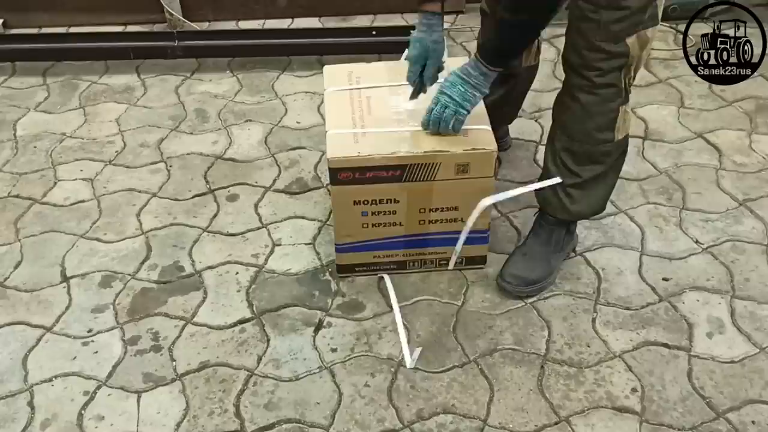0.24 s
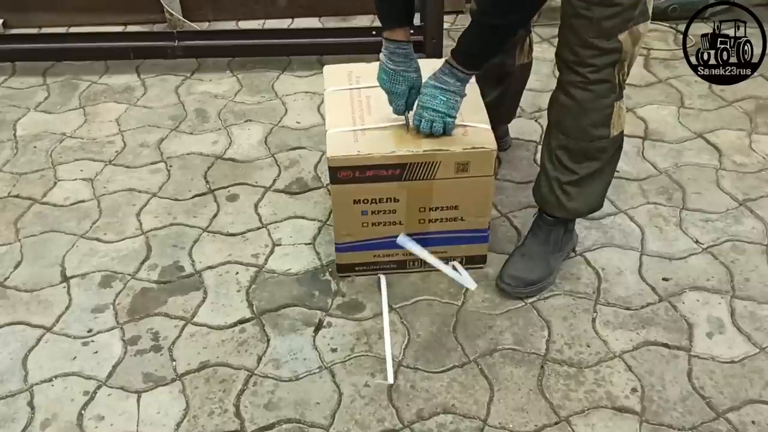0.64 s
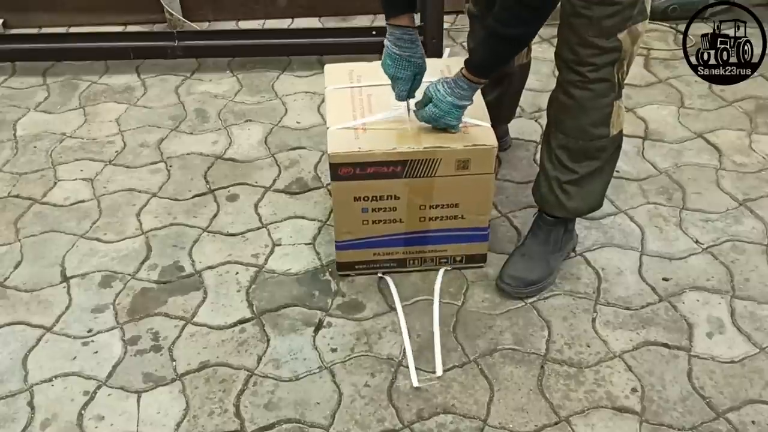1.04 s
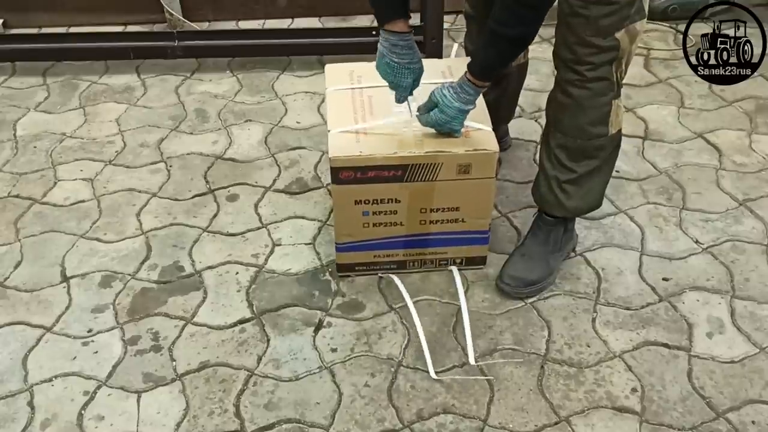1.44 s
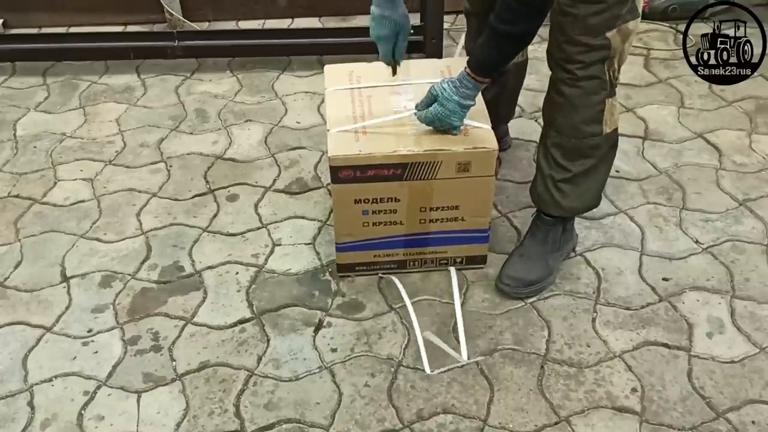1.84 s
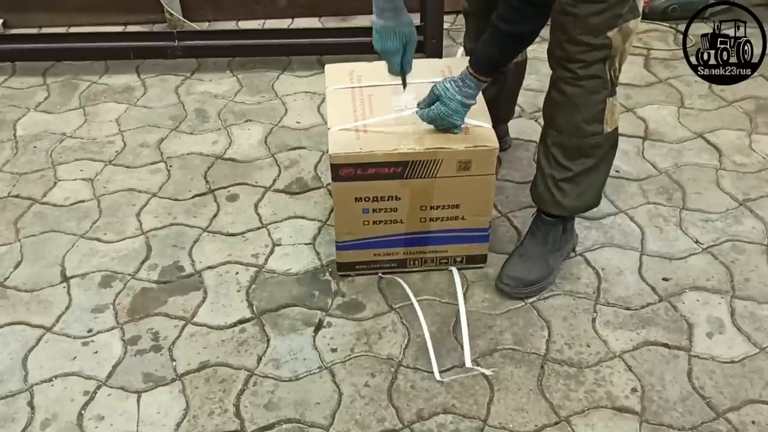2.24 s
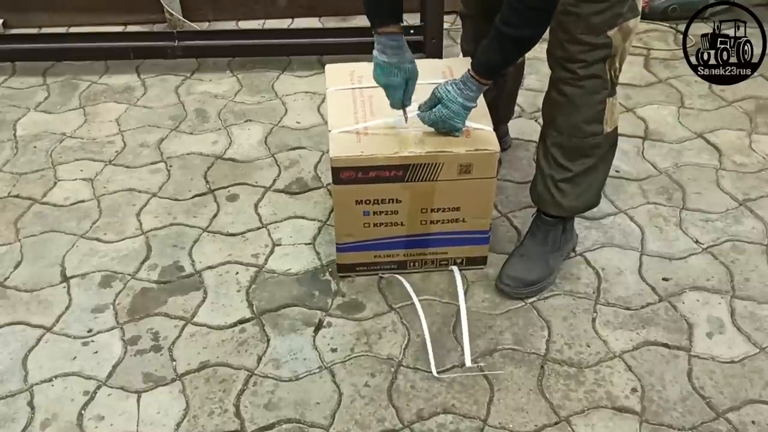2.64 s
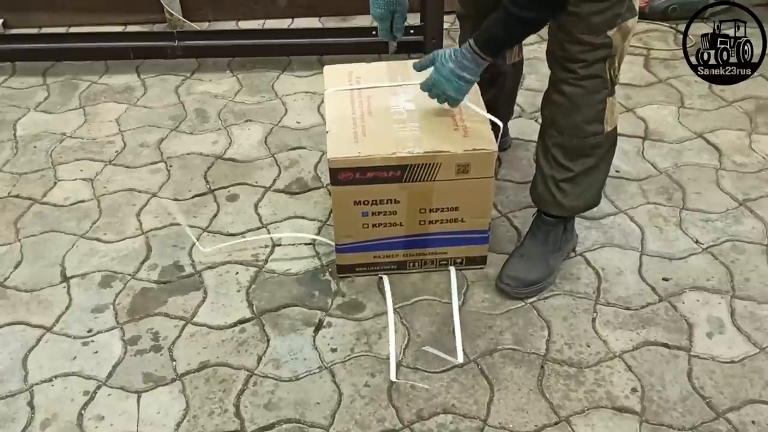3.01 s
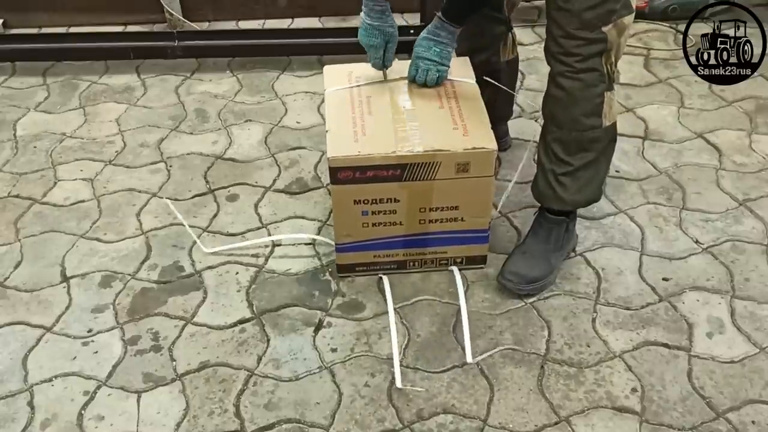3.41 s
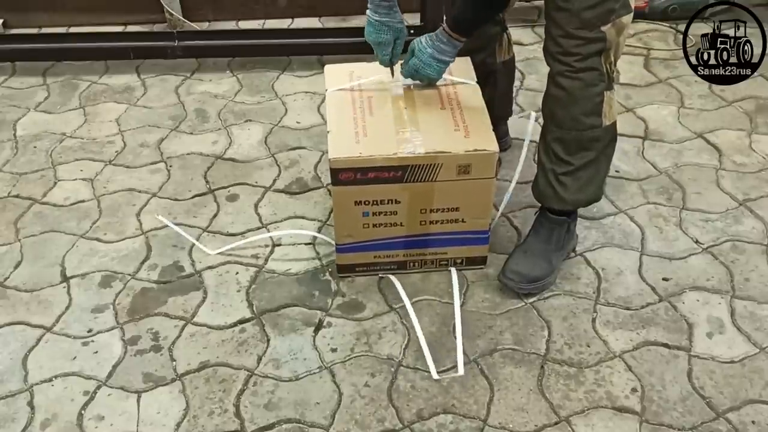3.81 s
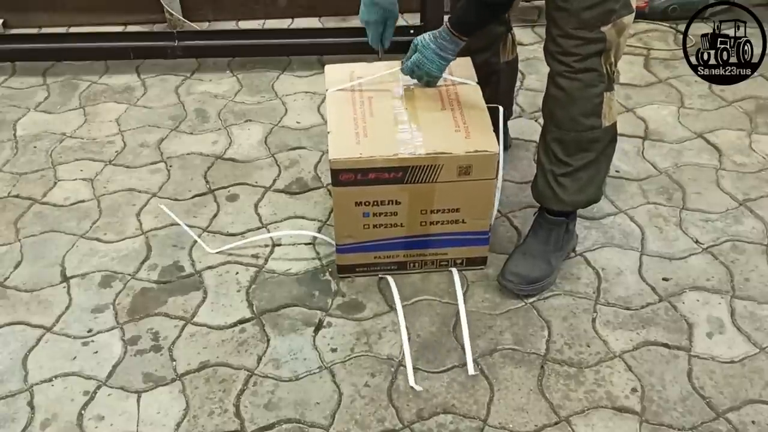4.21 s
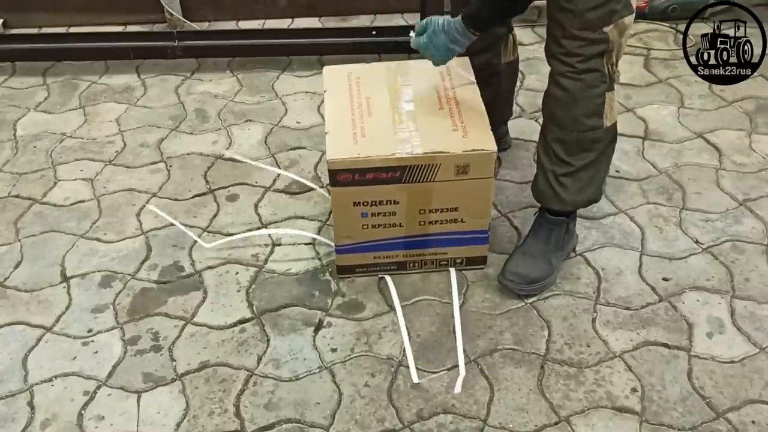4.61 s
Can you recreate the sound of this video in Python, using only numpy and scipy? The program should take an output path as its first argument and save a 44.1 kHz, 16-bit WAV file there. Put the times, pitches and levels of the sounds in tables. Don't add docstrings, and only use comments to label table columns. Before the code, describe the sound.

Gloved hands cut plastic packing straps from a cardboard box outdoors. Light bumps, dry rustles and ticks lead to a cluster of snaps, a short crack, and a hard bang with a boxy boom. After a quieter stretch of faint rubbing, two more violent whip-like snaps follow, then a small crack and a bump. Late, swelling echoes follow the blows; the small microphone clips and ducks briefly.

```python
import sys
import numpy as np
from scipy import signal
from scipy.io import wavfile
from scipy.ndimage import uniform_filter1d

SR = 44100
rng = np.random.default_rng(int(sys.argv[2]) if len(sys.argv) > 2 else 0)


def generate_wav(sig):
    pcm = np.round(np.clip(np.atleast_2d(sig).T, -1, 1) * 32767).astype(np.int16)
    wavfile.write(sys.argv[1], SR, pcm)


def volts_from_decibels(level):
    exponent = np.asarray(level, float) / 20
    return 10 ** exponent


N = 209651
LEAD = 2205
EARLY_S = -0.016

# frequency in Hz, level in dB.
HUM_SPECTRUM = [(25, -37), (45, -1), (90, -4.5), (380, -8), (700, -13), (1300, -22), (4400, -27),
                (7800, -31.5), (8900, -17), (11500, -15.5), (11700, -22.5), (16000, -14.5)]
# frequency in Hz, 60 dB decay in seconds.
YARD_DECAY = [(60, 0.41), (250, 0.66), (700, 0.84), (2000, 0.84), (5000, 0.68), (9000, 0.53), (16000, 0.4)]
# delay in seconds, level in dB.
ECHO_SWELL = [(0, -27), (.006, -1), (.02, 1), (.05, 1), (.1, 0.5), (.2, -0.5), (.3, -2.5), (.5, -3)]
# frequency in Hz, level in dB.
ECHO_TONE = [(60, 0), (150, -3.5), (250, 0.5), (8300, -0.5), (8800, -8), (11400, -13), (11900, -7.5),
             (16000, -10)]
# frequency in Hz, level in dB.
CRACK_ECHO_COLOUR = [(200, 3.5), (700, -7.5), (1500, -0.5), (3500, -0.5), (7000, -9), (8400, -8.5),
                     (9000, -2), (11300, 0.5), (12000, -3.5), (16000, -5)]
# frequency in Hz, level in dB.
SLAP_ECHO_COLOUR = [(50, 1.5), (130, -6), (220, 6), (310, -4.5), (400, 5), (500, -1), (950, -5.5),
                    (1600, -13), (4000, -32), (16000, -23.5)]
# frequency in Hz, level in dB.
OVERALL_TONE = [(30, -31), (80, -0.5), (4750, -1), (5050, -8.5), (5900, -9.5), (6150, -2.5), (7620, -7),
                (7760, -12.5), (8400, -15.5), (8800, -28.5), (11540, -29.5), (11640, -15.5), (15720, -23.5),
                (15880, -59)]

# frequency in Hz, 60 dB decay in seconds, level in dB.
BOX_MODES = [(169, 0.012, 12), (205, 0.036, -3), (319.7, 0.032, 5.5), (400, 0.084, -7.5), (522, 0.035, -2),
             (775, 0.029, 1.5), (974, 0.029, -2), (1297, 0.015, 0.5), (2130, 0.0069, 1.5)]
# frequency in Hz, level in dB.
STRAP_SPECTRUM = [(300, -43.5), (900, -7.5), (1500, 8), (2600, 3), (3600, 7), (4500, 1), (6300, 0),
                  (9000, -7), (16000, -2)]
# frequency in Hz, level in dB.
SCRAPE_SPECTRUM = [(300, -34), (1000, -3.5), (2500, -2), (4000, 2.5), (8000, -12.5), (16000, -0.5)]

# peak time in seconds, peak level in dB,
# rise in seconds, fall in seconds (both over 20 dB).
STRAP_SCRAPES = [(.485, -46, 0.12, 0.027), (.558, -47.5, 0.11, 0.054), (.637, -45, 0.008, 0.03),
                 (.675, -40, .02, 0.024), (.72, -70, .03, 0.34), (.812, -51.5, .045, 0.017),
                 (.838, -52, 0.0056, 0.024), (.86, -52.5, 0.025, .3), (.935, -46, 0.19, 0.013),
                 (1.17, -53, 0.12, 0.033), (1.405, -49, .011, 0.07), (1.522, -42, 0.026, 0.0057),
                 (1.99, -55, 0.056, 0.17), (2.1, -50, 0.19, 0.025), (2.126, -41, 0.0057, 0.0087),
                 (2.16, -44, 0.023, .006), (2.36, -53, 0.0094, .05), (2.414, -54, 0.006, .11),
                 (2.468, -32, 0.0039, 0.011), (2.503, -46, .018, .011), (2.808, -30.5, 0.01, 0.011),
                 (2.84, -47, .07, .011), (3.358, -48, .08, 0.12), (3.48, -52.5, .14, 0.15),
                 (3.658, -53.5, 0.11, 0.1), (3.706, -44, 0.041, 0.19), (4.016, -35.5, .006, 0.043),
                 (4.345, -57.5, .021, 0.24), (4.463, -32, 0.0082, 0.021), (4.71, -48, .011, .08)]
# peak time in seconds, peak level in dB,
# rise in seconds, fall in seconds (both over 20 dB).
GLOVE_SHOVES = [(.392, -52, 0.057, .04), (.485, -37, 0.048, 0.035), (.54, -47.5, 0.12, 0.41),
                (.636, -32.5, 0.005, 0.017), (.68, -35, 0.058, 0.015), (.74, -50, .11, 0.28),
                (.84, -46, 0.015, 0.066), (.936, -48, 0.035, 0.018), (1.11, -47.5, .015, 0.19),
                (1.405, -49, 0.0085, 0.1), (1.52, -40, 0.016, 0.0043), (1.865, -65, 0.012, 0.033),
                (1.95, -52, 0.032, 0.059), (2.11, -44.5, 0.4, 0.052), (2.158, -37, 0.021, 0.011),
                (2.47, -38.5, 0.012, 0.11), (2.51, -44, 0.044, 0.0045), (2.605, -39.5, 0.014, 0.088),
                (2.756, -41, 0.023, .024), (2.81, -34, 0.014, 0.12), (3.225, -46, .011, 0.061),
                (3.335, -48.5, .021, .16), (3.52, -49.5, 0.089, 0.16), (3.658, -41, 0.015, .021),
                (3.706, -48, 0.047, 0.27), (4.036, -36, 0.051, 0.014), (4.404, -47, 0.037, .21),
                (4.465, -35, 0.0082, 0.1), (4.705, -44, 0.0091, 0.011), (4.752, -35, 0.032, .021)]

# start in seconds, peak level in dB, # ring in Hz, 60
# dB decay in seconds, brightness in dB per octave.
FIBRE_BREAKS = [(.094, -23, 6500, .01, 14), (.668, -35, 2200, .03, -3), (1.3, -34, 6310, .01, 11),
                (1.5075, -34, 1600, .015, 7), (1.5215, -24, 6300, .03, 9), (2.801, -28, 4500, 0.034, 6),
                (2.8245, -28, 6300, .025, 8), (2.843, -15, 6300, .014, 8), (2.8564, -16, 3200, 0.014, 4),
                (2.697, -36.5, 4400, .015, 5), (4.054, -21, 7000, .03, 6), (4.4562, -28, 5600, .02, 6),
                (4.6786, -8, 3500, 0.0063, -2), (4.499, -6.5, 6500, 0.0052, 5), (1.5278, -4, 4220, 0.01, 7),
                (.483, -25.5, 2200, 0.0089, -1), (2.557, -28.5, 4000, .02, 1), (4.679, -9, 2340, 0.015, -2),
                (2.858, -4.5, 3450, .008, 4.5), (2.1685, -8.5, 2000, 0.011, 1.5), (2.9, -37, 6200, .01, 8),
                (.936, -41, 3000, .015, 3)]
# start in seconds, # length
# in seconds, start pitch in Hz, end pitch in Hz, level in dB.
MORE_DRONES = [
    (2.905, 0.059, 400, 425, -20.5),
    (4.55, 0.055, 400, 394, -17),
    (.805, .02, 205, 200, -42),
    (.925, 0.0255, 150, 150, -42),
    (2.97, .065, 390, 370, -29),
    (3.05, .08, 370, 400, -33),
    (3.14, .1, 380, 370, -40),
    (2.124, .04, 400, 400, -40),
    (4.6, .06, 410, 400, -25),
]
# start in seconds, peak level in dB,
# pitch in Hz, 60 dB decay in seconds.
STRAP_PINGS = [(1.528, -11, 3450, .012), (1.5285, -12, 4200, .01), (1.5285, -12, 6300, .012),
               (1.5285, -12, 7500, .01), (1.608, -14, 6800, .015), (4.0575, -8, 3500, .008),
               (4.679, -14, 2300, .012), (4.6795, -15, 3100, .012), (2.169, -13, 3200, .012),
               (2.169, -13, 1900, .012), (.483, -31, 1750, .012), (.634, -36, 850, .02),
               (3.199, -36, 2200, .02), (1.555, -22, 1000, .015)]
# start in seconds, length in seconds,
# start pitch in Hz, end pitch in Hz, level in dB.
STRAP_TWANGS = [(1.326, 0.023, 1660, 1640, -34), (1.35, 0.057, 558, 585, -42.5),
                (2.463, 0.052, 1350, 1395, -42), (2.565, 0.04, 1388, 1380, -39),
                (2.655, 0.04, 1380, 1395, -49), (3.201, 0.014, 2170, 2100, -40),
                (3.204, 0.14, 2150, 2100, -53), (3.81, 0.2, 1673, 1725, -64),
                (1.633, 0.013, 1480, 1490, -20.5), (2.858, 0.12, 400, 400, -23.5),
                (4.516, 0.18, 400, 400, -20.5), (4.057, 0.04, 725, 745, -21.5)]

# start in seconds, peak level in dB, ring in Hz,
# brightness in dB per octave.
LOOSE_TICKS = [(0.1943, -29, 1670, -2), (0.6747, -33, 2120, -10), (0.836, -48, 3320, 10),
               (0.9353, -46, 3160, -3), (1.174, -37, 1630, 7), (2.6976, -44, 2100, -3.5),
               (3.249, -40.5, 2160, -13), (3.3572, -32.5, 1820, 8), (3.466, -51, 3810, 2),
               (3.509, -39, 1560, 8), (3.6308, -38, 4540, 7), (3.754, -38, 1720, 3),
               (3.964, -41.5, 1670, -6)]
# start in seconds, peak level in dB, ring in Hz,
# brightness in dB per octave, share thrown to the walls in dB.
FRAYING_TEARS = [(0.6344, -34.5, 1800, 11, -7), (0.812, -35, 4350, 4, -14.5), (1.333, -19, 4330, 8, -21),
                 (1.347, -19, 1640, 3.5, -21), (1.6068, -9, 2300, 4.5, -16.5),
                 (2.1231, -29.5, 2150, 2, -10.5), (2.169, -9, 3360, -5, -14),
                 (2.4652, -25, 2540, 2.5, -13.5), (2.5171, -11.5, 1600, -7.5, -20.5),
                 (2.5574, -21.5, 2300, -7, -20), (2.806, -19, 1484, 3.5, -32),
                 (4.0095, -25.5, 1590, 3, -12), (4.0575, -12, 3530, 3, -44), (4.459, -22.5, 2280, 1.5, -35),
                 (4.679, -9.5, 1660, -1.5, -40)]
# start in seconds, peak level in dB, ring in Hz,
# brightness in dB per octave, share thrown to the walls in dB.
DRY_SNAPS = [(0.4817, -28.5, 1820, -2.5, -23), (1.087, -17.5, 3180, 7, -29.5), (1.0975, -29, 1740, 1, -31),
             (1.3228, -26, 4300, 10, -6.5), (1.327, -14.5, 1630, 9, -27), (1.481, -31, 1540, 11, -16),
             (1.5279, -11, 2500, 2, -10.5), (1.555, -12.5, 1520, 3, -14.5), (1.6334, -9, 1500, -5.5, -16),
             (2.4166, -27, 1600, 14.5, -30), (2.827, -23.5, 2470, 0.5, -13),
             (2.8438, -15.5, 2130, -1, -8.5), (2.858, 2.5, 1590, -5, -24.5), (3.199, -30.5, 2290, -5, -16),
             (3.7142, -31, 2540, 3, -22), (4.0409, 4.5, 3596, -1.2, -24), (4.475, -23, 3140, 8, -17),
             (4.4977, -6.5, 3150, 4, -13), (4.5031, 1.5, 2160, 1, -22.5)]
# peak level in dB, ring in Hz, brightness in dB per octave,
# share thrown to the walls in dB.
EARLIER_CRACK = (-11.5, 3300, 0.1, -10)

# start in seconds, peak level in dB, panel in Hz,
# share thrown to the walls in dB, 60 dB decay in seconds.
BOX_BUMPS = [(0.482, -29, 314, -25, 0.076), (0.5445, -28, 150, -17.5, 0.064), (0.633, -32, 300, -18, .05),
             (0.646, -26.5, 170, -16, 0.07), (0.6752, -24, 281, -29, 0.071), (0.834, -35, 127, -40, 0.12),
             (1.323, -41.5, 260, -4.5, .1), (2.122, -30.5, 361, -12, 0.14),
             (2.517, -21.5, 382, -12.5, 0.087), (2.847, -23, 267, -29, .07), (3.506, -33, 237, -27, 0.082),
             (4.459, -33.5, 320, -23, .1), (4.479, -36, 205, -11, .07), (4.68, -25.5, 214, -15, .1),
             (4.74, -18, 310, -20, .1)]
# start in seconds, peak level in dB,
# patch in Hz, 60 dB decay in seconds.
EDGE_KNOCKS = [
    (1.607, -13, 1377, 0.042),
    (2.169, -9, 790, 0.015),
    (2.52, -17, 1390, 0.026),
    (2.858, 3.5, 888, 0.024),
    (4.041, -3.5, 933, 0.024),
    (4.059, -4, 786, 0.0097),
    (4.503, 5, 785, 0.0095),
]
# start in seconds,
# peak level in dB, panel in Hz, share thrown to the walls in dB.
STRAP_WHIPS = [(1.085, -29.5, 358, -12.5), (1.553, -19.5, 382, -16), (1.606, -11, 205, -14.5),
               (1.633, -12.5, 205, -18.5), (2.167, -8.5, 358, -17), (2.554, -28.5, 243, -27),
               (2.699, -36, 263, -26), (2.857, 5.5, 357.6, -17), (3.345, -40, 149.5, -5.5),
               (3.451, -41.5, 154, -5), (3.702, -29.5, 241, -17), (3.749, -33.5, 198, -13),
               (4.039, -4, 214, -20.5), (4.051, -1, 487, -20.5), (4.057, 5.5, 758, -26),
               (4.07, -9.5, 300, -26), (4.497, -13, 308, -9.5), (4.503, 5, 622, -16.5),
               (4.506, -0.5, 320, -13)]
# peak level in dB, panel in Hz, share thrown to the walls in dB.
EARLIER_SLAP = (-1.5, 288, -15)


def evened(x):
    return x / np.sqrt(np.mean(x ** 2) + 1e-20)


def read(points, hz):
    f, value = np.transpose(points)
    return np.interp(np.log(hz + 1), np.log(f + 1), value)


def add(mix, s, sound):
    part = mix[round(s * SR) + LEAD:][:len(sound)]
    part += sound[:len(part)]


def colour(x, points, size=4096):
    log_gain = np.log(volts_from_decibels(read(points, abs(np.fft.fftfreq(size, 1 / SR)))))
    taps = np.fft.ifft(np.exp(np.conj(signal.hilbert(log_gain)))).real[:size // 2]
    return signal.oaconvolve(x, taps)[:len(x)]


def ring(hz, t60, size=3000):
    t = np.arange(size) / SR
    return volts_from_decibels(-60 * t / t60) * np.sin(2 * np.pi * hz * t)


def air():
    hz = np.fft.rfftfreq(1024, 1 / SR)
    real, imag, patches = rng.standard_normal(((N + LEAD) // 256 + 5, 513, 3)).T
    patches = evened(uniform_filter1d(uniform_filter1d(patches, 10, 0), 12, 1))
    depth_db = np.interp(hz, [5000, 9000], [2.3, 0.8])[:, None]
    z = (real + 1j * imag) * volts_from_decibels(read(HUM_SPECTRUM, hz)[:, None] + depth_db * patches)
    hum = signal.istft(z, nperseg=1024, noverlap=768)[1][:N + LEAD]
    return volts_from_decibels(-47) * evened(hum)


def yard(feeds):
    taps = np.zeros((len(feeds), SR))
    at = np.arange(40, SR - 12, 12)
    at = at + rng.integers(0, 12, (len(feeds), len(at)))
    np.put_along_axis(taps, at, rng.choice([-1., 1.], at.shape), 1)
    swell = volts_from_decibels(np.interp(np.arange(SR) / SR, *np.transpose(ECHO_SWELL)))
    hz, t, z = signal.stft(taps * swell, SR, nperseg=256)
    chance = rng.standard_normal(z.shape)
    lumps = evened(uniform_filter1d(uniform_filter1d(chance, 4, 1), 5, 2))
    glints = evened(uniform_filter1d(chance, size=60, axis=1))
    decay_db = -60 * t / read(YARD_DECAY, hz)[:, None]
    tails = signal.istft(z * volts_from_decibels(1.97 * lumps + 0.61 * glints + decay_db), SR, nperseg=256)[1]
    tails = tails / np.linalg.norm(tails, axis=1, keepdims=True)
    echo = signal.fftconvolve(feeds, tails, axes=1)[:, :N + LEAD].sum(0)
    return colour(echo, ECHO_TONE)


def strokes(rows, t):
    return sum(volts_from_decibels(db - 20 * np.maximum((s - t) / rise, (t - s) / fall)) for s, db, rise, fall in rows)


def drags():
    t = (np.arange(N + LEAD) - LEAD) / SR
    slips = volts_from_decibels(3.6 * evened(uniform_filter1d(rng.standard_normal(len(t)), 300)))
    noise = rng.standard_normal((2, len(t)))
    grains_db = 2.0 * np.minimum(rng.exponential(1, (2, len(t))), 5)
    grit = noise * volts_from_decibels(grains_db) * slips
    bright = evened(colour(grit[0], SCRAPE_SPECTRUM))
    box = sum(volts_from_decibels(d) * ring(f, t60) for f, t60, d in BOX_MODES)
    dull = evened(signal.oaconvolve(grit[1], box)[:len(t)])
    return strokes(STRAP_SCRAPES, t) * bright + strokes(GLOVE_SHOVES, t) * dull


def twang(length, start_hz, end_hz, db, noise):
    u = np.linspace(0, 1, round(length * SR))
    flutter, wander = (evened(uniform_filter1d(z, 450))[:len(u)] for z in noise)
    glide_hz = start_hz + (end_hz - start_hz) * u
    tone = np.sin(2 * np.pi * np.cumsum(glide_hz) / SR + 0.65 * wander)
    return volts_from_decibels(db - 4.0 * u) * tone * (1 + 0.5 * flutter) * signal.windows.tukey(len(u), 0.4)


def crack(db, hz, t60, tilt_db, noise):
    t = np.arange(len(noise)) / SR
    splutter = noise * volts_from_decibels(-60 * t / t60) * (1 - np.exp(-t / 0.00036)) ** 2
    tilted = [(f, d + tilt_db * np.log2(np.clip(f, 700, 8000) / 2500)) for f, d in STRAP_SPECTRUM]
    burst = colour(splutter, tilted)
    loose_end = np.convolve(splutter, ring(hz, 0.0048, size=400))[:len(t)]
    sound = evened(burst) + 1.15 * volts_from_decibels(-abs(tilt_db)) * evened(loose_end)
    return volts_from_decibels(db) * sound / abs(sound).max()


def slap(db, hz, t60, touch_ms, weights):
    panels = sum(w * volts_from_decibels(d) * ring(f, t) for w, (f, t, d) in zip(weights, BOX_MODES))
    push = np.exp(-(np.arange(-200, 200) / (SR * touch_ms / 4000 + 1)) ** 2)
    sound = np.convolve(ring(hz, t60) + 0.33 * panels, push)[160:]
    sound = signal.lfilter(*signal.butter(2, 105, "high", fs=SR), sound)
    return volts_from_decibels(db) * sound / abs(sound).max()


def fibres():
    out = np.zeros(N + LEAD)
    for (s, *tick), z in zip(FIBRE_BREAKS, rng.standard_normal((len(FIBRE_BREAKS), 2000))):
        add(out, s, crack(*tick, z))
    for (s, *tone), z in zip(MORE_DRONES, rng.standard_normal((len(MORE_DRONES), 2, 12000))):
        add(out, s, twang(*tone, z))
    onset = np.minimum(np.arange(3000) / 20, 1)
    for s, db, hz, t60 in STRAP_PINGS:
        add(out, s, volts_from_decibels(db) * ring(hz, t60) * onset)
    return out


def all_cracks():
    snaps = [(*r, 0.015) for r in [(EARLY_S, *EARLIER_CRACK), *DRY_SNAPS]]
    tears = [(*r, 0.028) for r in FRAYING_TEARS]
    ticks = [(*r, -16.5, 0.013) for r in LOOSE_TICKS]
    return sorted(snaps + tears + ticks)


def all_slaps():
    whips = [(*r, 0.031, np.interp(r[1], [-24, 0], [0.52, 0.22]))
             for r in [(EARLY_S, *EARLIER_SLAP), *STRAP_WHIPS]]
    bumps = [(*r, 1.5) for r in BOX_BUMPS]
    knocks = [(s, db, hz, -48, t60, 0.19) for s, db, hz, t60 in EDGE_KNOCKS]
    return sorted(whips + bumps) + knocks


def hits():
    dry, blows = np.zeros(N + LEAD), np.zeros((2, 3, N + LEAD))
    cracks, slaps = all_cracks(), all_slaps()
    noises = rng.standard_normal((len(cracks), 2000))
    for k, ((s, db, hz, tilt_db, echo_db, t60), z) in enumerate(zip(cracks, noises)):
        add(dry, s, crack(db, hz, t60, tilt_db, z) * (s > 0))
        add(blows[0, k % 3], s, volts_from_decibels([db + echo_db + 30]))
    weights = rng.standard_normal((len(slaps), len(BOX_MODES)))
    for k, ((s, db, hz, echo_db, t60, touch_ms), w) in enumerate(zip(slaps, weights)):
        add(dry, s + 0.00067, slap(db, hz, t60, touch_ms, w) * (s > 0))
        add(blows[1, k % 3], s, volts_from_decibels([db + echo_db + 41.5]))
    for (s, *tone), z in zip(STRAP_TWANGS, rng.standard_normal((len(STRAP_TWANGS), 2, 12000))):
        add(dry, s, twang(*tone, z))
    crack_feeds = [colour(b, CRACK_ECHO_COLOUR) for b in blows[0]]
    slap_feeds = [colour(b, SLAP_ECHO_COLOUR) for b in blows[1]]
    return dry, np.array(crack_feeds + slap_feeds)


def scene():
    dry, feeds = hits()
    rubbing = drags()
    feeds[0] += volts_from_decibels(-15.5) * rubbing
    return (dry + rubbing + yard(feeds) + air() + fibres())[None, LEAD:]


def top_cut(x):
    return signal.sosfilt(signal.butter(12, 16450, fs=SR, output="sos"), x)


def record(dry):
    x = colour(dry[0], OVERALL_TONE)
    power_db = 10 * np.log10(abs(uniform_filter1d(x ** 2, 130)) + 1e-12)
    recovery_db = np.arange(N) * 162.0 / SR
    start_db = -5.5
    held_db = np.maximum.accumulate(np.maximum(power_db + recovery_db, start_db)) - recovery_db
    over_db = np.maximum(held_db + 13.0, 0)
    lag = np.exp(-1 / (0.0023 * SR))
    duck_db = signal.lfilter([1 - lag], [1, -lag], over_db, zi=[lag * over_db[0]])[0]
    ducked = x * volts_from_decibels(1.5 - 0.49 * duck_db)
    mix = np.clip(ducked, -0.99, 0.99)[None]
    return top_cut(mix)


dry = scene()
out = record(dry)
generate_wav(out)
```